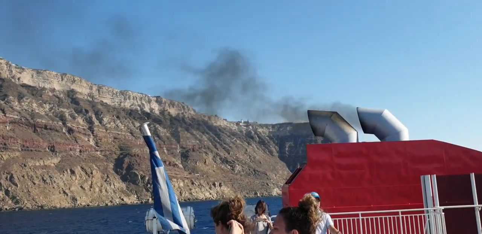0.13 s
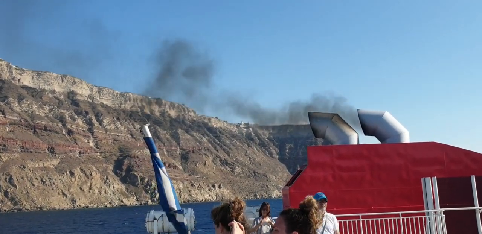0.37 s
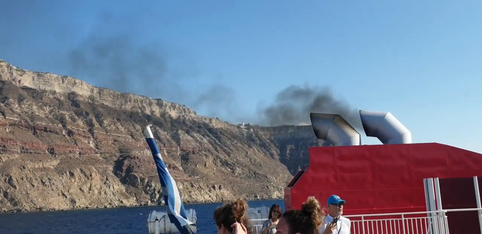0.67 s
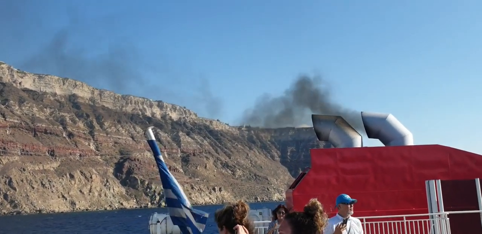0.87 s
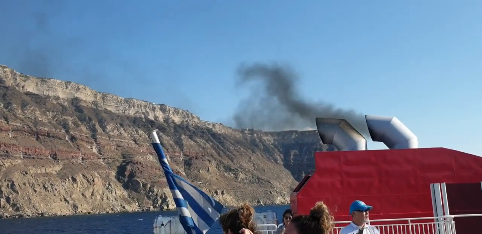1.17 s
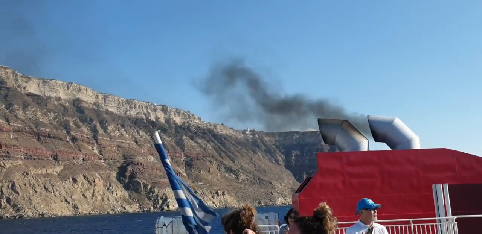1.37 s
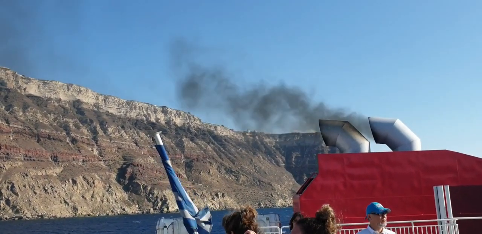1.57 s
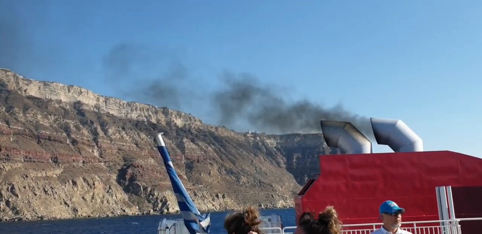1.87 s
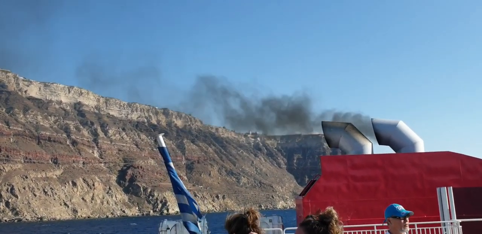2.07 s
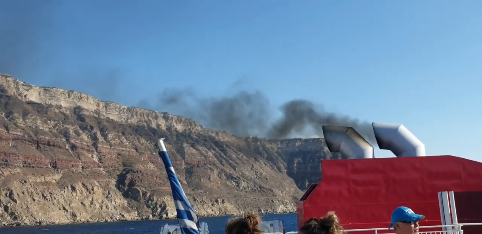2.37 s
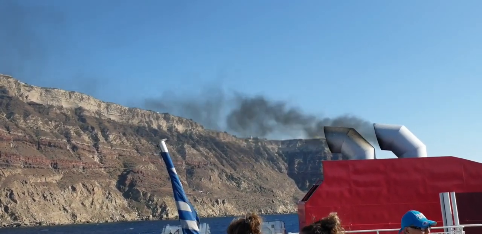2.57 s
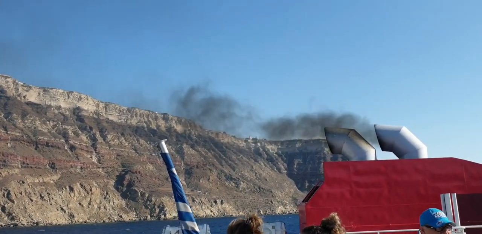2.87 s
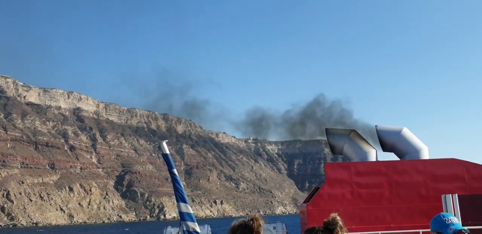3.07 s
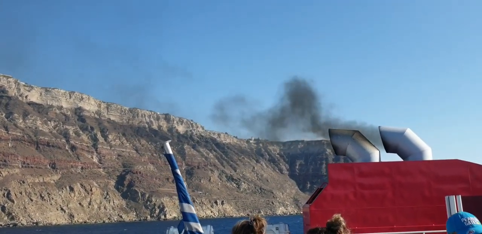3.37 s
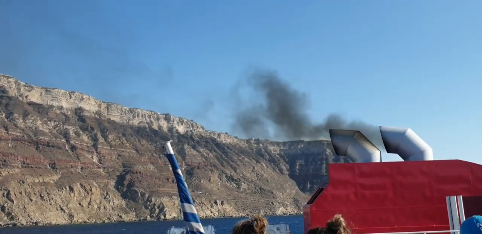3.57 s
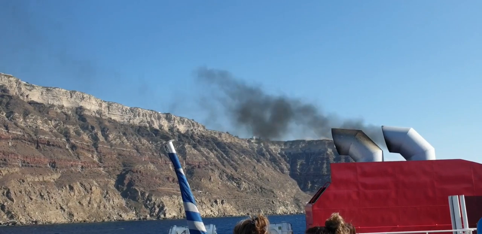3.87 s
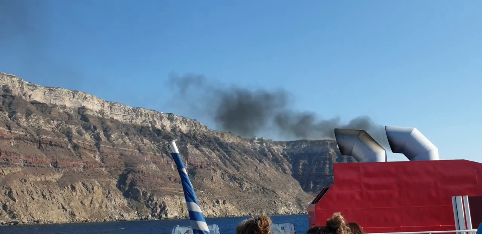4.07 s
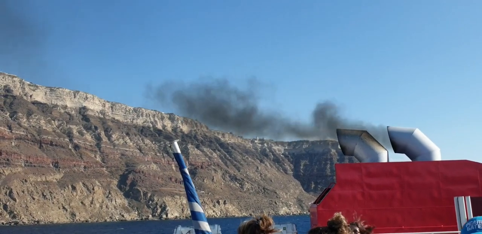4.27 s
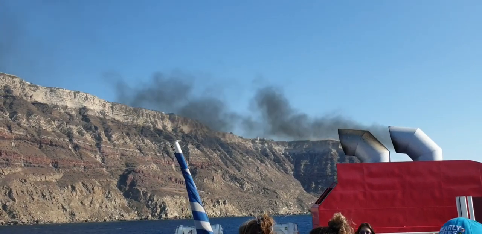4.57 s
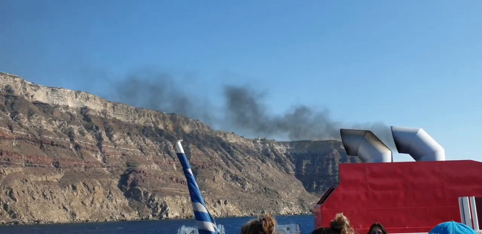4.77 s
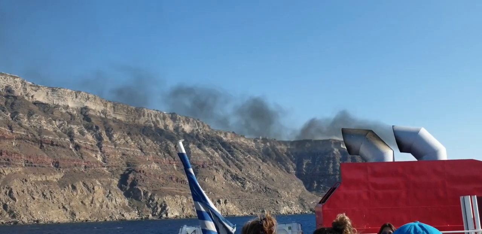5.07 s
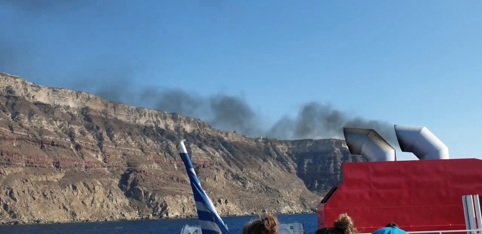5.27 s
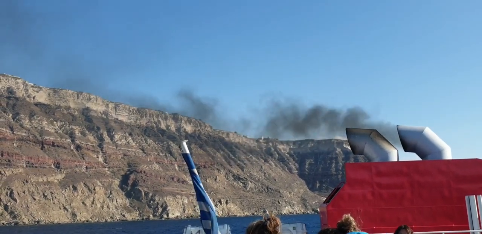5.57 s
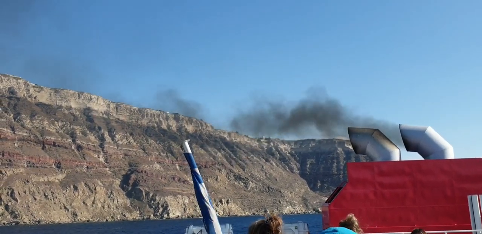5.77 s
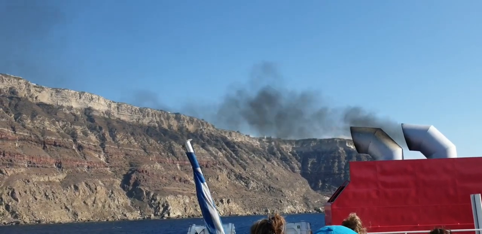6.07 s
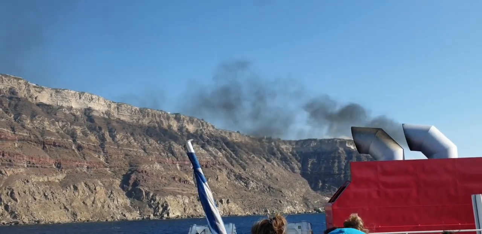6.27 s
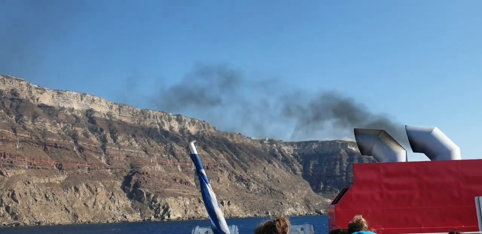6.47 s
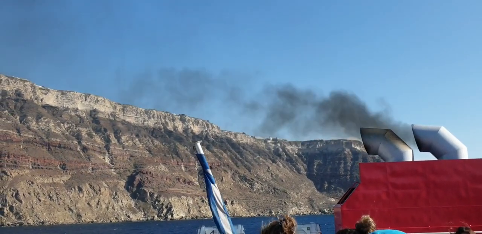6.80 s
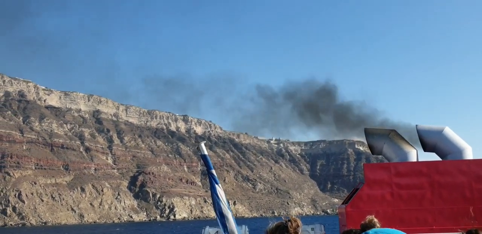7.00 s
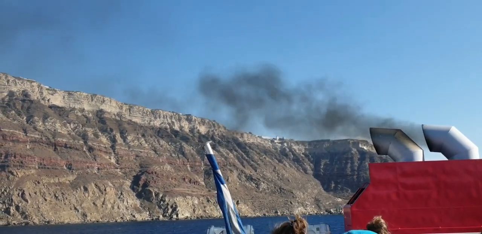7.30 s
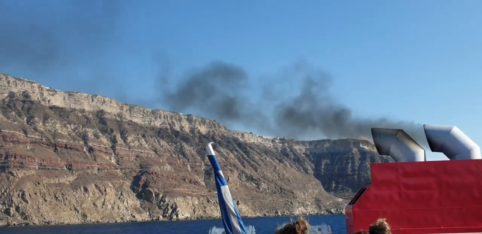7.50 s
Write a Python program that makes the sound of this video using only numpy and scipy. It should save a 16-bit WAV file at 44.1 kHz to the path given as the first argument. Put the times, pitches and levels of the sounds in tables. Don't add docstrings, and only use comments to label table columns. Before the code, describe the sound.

Deep uneven engine rumble and funnel roar, a steady fan hiss to the right, wind buffeting mostly on the left, faint splashes and tiny metal ticks.

```python
import sys
import numpy as np
from scipy import signal
from scipy.fft import rfft, irfft, next_fast_len
from scipy.io import wavfile
from scipy.ndimage import uniform_filter1d, map_coordinates

SR = 44100
rng = np.random.default_rng(int(sys.argv[2]) if len(sys.argv) > 2 else 0)


def attenuation_scalar(level_db):
    decades = np.asarray(level_db, float) / 20
    return 10 ** decades


def to_wav(s):
    ch = np.atleast_2d(s).T
    pcm = np.round(np.clip(ch, -1, 1) * 32767)
    wavfile.write(sys.argv[1], SR, pcm.astype(np.int16))


N = 336924


def unit(x):
    return x / np.sqrt(np.mean(x ** 2) + 1e-20)


def along(points, hz):
    f, v = np.transpose(points)
    return np.interp(np.log(hz + 1), np.log(f + 1), v)


def curves(rows):
    s, *columns = np.transpose(rows)
    return [np.interp(np.arange(N) / SR, s, column) for column in columns]


def wobble(rate):
    knots = rng.standard_normal(int(N * rate / SR) + 4)
    return map_coordinates(knots, [np.arange(N) * rate / SR])


def filtered(x, response):
    m = next_fast_len(x.shape[-1] + SR // 2)
    spectrum = rfft(x, m) * response(np.fft.rfftfreq(m, 1 / SR))
    return irfft(spectrum, m)[..., :x.shape[-1]]


def rush(spectrum, alike, patchy_db):
    z = signal.stft(rng.standard_normal((2, N)), nperseg=512)[2]
    patches = uniform_filter1d(rng.standard_normal(z.shape[1:]), size=6, axis=0)
    patches = unit(uniform_filter1d(patches, size=10, axis=1))
    pair = signal.istft(z * attenuation_scalar(patchy_db * patches), nperseg=512)[1][:, :N]

    def mid_side(hz):
        angle = np.arccos(np.clip(along(alike, hz), -1, 1)) / 2
        return attenuation_scalar(along(spectrum, hz)) * [np.cos(angle), np.sin(angle)]

    mid, side = filtered(pair, mid_side)
    return unit(np.array([mid + side, mid - side]))


def sides(pan_db):
    return attenuation_scalar(np.array([pan_db / 2, -pan_db / 2]))


def gusting():
    # peak t/s, half length/s, level over the calm/dB, left minus right/dB
    gust_rows = [(.08, .14, 7, -1.5), (0.301, .08, 4, 6), (0.549, .07, 6, -0.5), (0.678, .08, 7, 10.5),
                 (.91, .05, 6, 4), (1.037, .04, 4, -6.5), (1.303, .08, 5, 0.5), (1.75, .1, 4, -1.5),
                 (2.08, .05, 5, 2.5), (2.19, .07, 7, 13), (2.38, .08, 6, -5), (2.624, .05, 4, 7.5),
                 (2.9, .07, 5, 1), (3.27, .04, 7, 11), (3.462, .06, 9, 8.5), (3.801, .2, 3, -3.5),
                 (4.179, .05, 5, 11.5), (4.52, .05, 4.5, 10), (4.736, .04, 4, -0.5), (4.958, .07, 9, -2.5),
                 (5.151, .07, 6, 3.5), (5.36, .14, 11, 7.5), (5.598, .15, 11, -1.5), (5.9, .15, 5, 0),
                 (6.131, .06, 8, 1.5), (6.282, .11, 12, 4.5), (6.5, .1, 5, -4), (6.752, .12, 6.5, -1.5),
                 (7.102, .08, 4, 1.5), (7.379, .12, 5, -2)]
    calm_db = -50
    s, half, db, pan_db = np.transpose(gust_rows)[..., None]
    t = np.arange(0, N, 64) / SR
    bell = np.exp(-((t - s) / half) ** 2)
    level_db = calm_db + (db * bell).sum(axis=0)
    lean_db = (pan_db * bell).sum(axis=0)
    return [np.interp(np.arange(N) / SR, t, v) for v in (level_db, lean_db)]


def breeze():
    strength_db = uniform_filter1d(gusting()[0], size=SR // 3)
    return strength_db - strength_db.mean()


def firings(speed, carry_db, strength, late, scatter_db):
    speed = np.pad(speed, SR, mode="edge")
    cycle = np.cumsum(speed) / SR - speed[0]
    whole = np.arange(-5, 50)[:, None]
    firing = whole + (np.arange(len(late)) + late) / len(late)
    at = np.interp(firing, cycle, np.arange(len(cycle))).ravel()
    scatter = attenuation_scalar(scatter_db * rng.standard_normal((len(whole), len(late))))
    pulses = SR * np.bincount(np.round(at).astype(int), (strength * scatter).ravel(), len(cycle))
    return pulses * np.pad(attenuation_scalar(carry_db), SR, mode="edge")


def engines():
    # t/s, near engine f/Hz, far engine f/Hz
    speed_rows = [(0.0, 5.845, 5.886), (0.955, 5.874, 5.908), (1.91, 5.9, 5.938), (2.865, 5.924, 5.988),
                  (3.82, 5.981, 5.985), (4.775, 5.999, 6.049), (5.73, 6.033, 6.074), (6.685, 6.062, 6.146),
                  (7.64, 6.1, 6.058)]
    cylinders = [(0.53, -0.31, 0.76, -0.73), (0.91, -0.25, 0.86, -0.69), (0.3, -0.87, 0.6, -0.71),
                 (1.62, -0.24, 0.47, 0.18), (0.76, -0.09, 0.63, 0.16), (1.3, -0.02, 0.54, -0.57),
                 (0.22, -0.08, 0.85, 0.19), (2.0, -0.22, 1.0, -0.38), (1.04, -0.18, 0.64, -0.85),
                 (1.53, -0.1, 0.85, -0.63), (0.41, 0.1, 0.2, -0.04), (0.8, -0.12, 0.72, -0.71)]
    # t/s, near level/dB, far level/dB
    carry = [(0, 0.5, 1), (.6, 0, 2.5), (1.2, -2, 3), (1.8, 0, 1.5), (2.4, -0.5, 2), (3, -2, 0),
             (3.6, 1, -6.5), (4.2, 1, 2.5), (4.8, 1, -5), (5.4, -0.5, -4), (6, 2.5, 5), (6.6, 0.5, -.5),
             (7.1, -3.5, 4.5), (7.64, -3, 2)]
    # f/Hz, width/Hz, level/dB
    pipe_modes = [(32.8, 6.0, -64.5), (70.1, 15.6, -55.3), (125.3, 10.0, -71.3)]
    # multiple of the cycle, level/dB
    leak_tones = [(24, -49.5), (25, -44.5), (27, -64.5), (29, -52), (30, -43.5), (31, -51.5)]
    silencer_hz = 125
    near, near_late, far, far_late = np.transpose(cylinders)
    near_speed, far_speed = curves(speed_rows)
    near_db, far_db = curves(carry)
    pulses = firings(near_speed, near_db, near, near_late, scatter_db=0.27)
    pulses = pulses + firings(far_speed, far_db, far, far_late, scatter_db=2.15)

    def funnel(f):
        pipe = 0
        for k, (c, width, db) in enumerate(pipe_modes):
            pipe = pipe + (-1) ** k * attenuation_scalar(db) * 1j * f * width / (c * c - f * f + 1j * f * width)
        return pipe / np.sqrt(1 + (f / silencer_hz) ** 16)

    throb = filtered(pulses, funnel)[SR:SR + N]
    crank = 2 * np.pi * np.cumsum(near_speed) / SR
    leak = 0
    for k, db in leak_tones:
        leak = leak + attenuation_scalar(db + 1.0 * wobble(1.2)) * np.sin(np.round(k) * crank + wobble(0.93))
    return (throb + leak) * sides(-3.5)[:, None]


def roar():
    # f/Hz, level/dB per Hz
    gas = [(14, -38), (25, -25.5), (36, -13.5), (46, -3), (76, -4.5), (95, -14.5), (122, -2), (136, -16.5),
           (150, -11.5), (182, -15.5), (210, -19), (400, -31), (1100, -44.5), (2000, -70)]
    # f/Hz, left-right likeness
    gas_alike = [(60, .9), (120, .82), (200, 0.97), (400, 0.48), (1000, 0.15)]
    noise = attenuation_scalar(-28.0) * rush(gas, gas_alike, patchy_db=0.5) * sides(-3.8)[:, None]
    upper = filtered(noise, lambda f: np.clip((f - 100) / 40, 0, 1) * np.clip((400 - f) / 180, 0, 1))
    flow_db = 0.46 * breeze() + 1 * wobble(7)
    return noise + (attenuation_scalar(flow_db) - 1) * upper


def splashes():
    # crest t/s, rise/s, level over the wash/dB
    crests = [
        (2.15, .4, 0.5),
        (3.7, .2, 1.5),
        (4.2, 0.09, 3),
        (4.9, .06, 2),
        (5.24, .06, 2.5),
        (5.6, 0.056, 3.5),
        (5.75, .04, 2.5),
        (5.899, .1, 4),
        (6.4, .12, 4.5),
    ]
    fall_share = 0.91
    t = np.arange(N) / SR
    lift_db = 0
    for s, rise, db in crests:
        span = np.where(t < s, rise, fall_share * rise)
        lift_db = lift_db + db * np.exp(-((t - s) / span) ** 2)
    return lift_db


def vents(flutter):
    # f/Hz, level/dB per Hz
    fans = [(450, -24.5), (700, -9), (1000, -6), (1130, -8), (1230, -4), (1270, 1), (1330, 0), (1460, -2.5),
            (1810, -3), (2100, 0), (2440, -7), (3020, -5), (3250, -7.5), (4160, -42)]
    # f/Hz, left minus right/dB
    shadow = [(700, -6.5), (1200, -4.5), (1800, -8.5), (2750, -10.5), (3600, -14)]
    lag_s = .00045
    hiss = rush(fans, [(1000, 0.69), (3000, 0.52)], patchy_db=0.57)
    blade_hz = 1290 + 9 * wobble(18)
    blade = attenuation_scalar(-17.5 + 3 * wobble(5.7)) * np.sin(2 * np.pi * np.cumsum(blade_hz) / SR)
    left = filtered(hiss[0] + blade, lambda f: attenuation_scalar(along(shadow, f)) * np.exp(-2j * np.pi * f * lag_s))
    level_db = -44 + 0.24 * breeze() + .45 * splashes() + 0.2 * wobble(12) + 2.5 * flutter
    return attenuation_scalar(level_db) * np.array([left, hiss[1] + blade])


def spray(flutter):
    # f/Hz, level/dB per Hz
    ports = [
        [(2500, -27.5), (3300, 4), (4500, 1), (7300, -0.5), (8600, -8.5), (11000, -3.5), (14000, -5),
         (15700, -9)],
        [(2500, -31), (3500, 2), (4500, 4), (5800, -1.5), (8000, -8.5), (10000, -10), (11500, -4),
         (13000, -18.5), (15700, -20)],
    ]
    white = rush([(1000, 0)], [(4000, 0.1), (12000, 0.12)], patchy_db=0.3)
    wash = unit(filtered(white, lambda f: attenuation_scalar([along(port, f) for port in ports])))
    level_db = -61.5 + .12 * breeze() + splashes() + 0.51 * wobble(9) + 1.8 * flutter
    return attenuation_scalar(level_db) * wash


def swarm(count):
    crowd = np.cumsum(attenuation_scalar(1.8 * gusting()[0]))
    place, size, pitch, port = rng.random(count), *rng.standard_normal((count, 3)).T
    s = np.interp((np.arange(count) + place) / count, crowd / crowd[-1], np.arange(N) / SR)
    level_db, hz, pan_db = -31.5 + 2.5 * size, 313 * attenuation_scalar(1.8 * pitch), 9 + 11 * port
    return list(zip(np.clip(s, .05, 7.5), level_db, hz, pan_db))


def buffeting():
    # f/Hz, level/dB per Hz
    rumble = [(40, -6), (150, -0.5), (300, -7.5), (500, -12.5), (900, -28), (1600, -47.5), (4000, -69)]
    buffet_db, pan_db = gusting()
    lumps = attenuation_scalar(3.5 * np.array([wobble(70), wobble(70)]))
    white = unit(lumps * rng.standard_normal((2, N)))
    turbulence = unit(filtered(white, lambda f: attenuation_scalar(along(rumble, f))))
    veer_db = 5 * wobble(9)
    return turbulence * attenuation_scalar(buffet_db + 7.0 + 0.6 * wobble(8)) * sides(1.2 * pan_db + veer_db)


def wind():
    # t/s, level/dB, f/Hz, left minus right/dB
    strong = [(0.293, -23.5, 260, 10), (0.541, -23.5, 570, 15), (0.563, -25.5, 265, 1),
              (0.612, -20, 251, -2.5), (0.64, -19, 347, 24), (0.686, -13.5, 360, 24),
              (0.912, -14.5, 390, 10), (0.959, -20, 252, -20), (1.031, -22.5, 259, -16),
              (1.712, -31, 250, 12), (2.069, -21, 312, 9), (2.172, -16, 327, 12), (2.268, -19.5, 340, 14),
              (2.41, -19, 283, -17), (2.62, -25, 370, 18), (3.252, -17, 240, 5.5), (3.29, -21.5, 450, 17),
              (3.467, -23, 336, 15), (4.188, -23, 250, 15), (5.002, -19, 250, -26.5), (5.363, -24, 293, 19),
              (5.525, -25, 480, 3.5), (5.637, -24, 700, -6), (5.727, -21.5, 250, 13),
              (6.124, -15.5, 287, 13), (6.205, -17.5, 385, 21), (6.253, -15, 380, -18),
              (6.283, -30, 640, 7), (6.356, -25, 730, 17), (7.353, -24, 248, 14)]
    eddy_cycles = 1.82
    gusts = buffeting()
    half = SR // 40
    t = np.arange(-half, half) / SR
    eddies = [*strong, *swarm(count=50)]
    for (s, db, hz, pan_db), turn in zip(eddies, rng.random(len(eddies))):
        swell = np.exp(-(t / (0.34 * eddy_cycles / hz)) ** 2)
        puff = swell * np.sin(2 * np.pi * (0.94 * hz * t + turn))
        rag = signal.lfilter(*signal.butter(3, 700, fs=SR), rng.standard_normal((2, len(t))))
        puff = puff + 1.3 * np.sqrt(swell) * rag
        far_port = attenuation_scalar(np.minimum(0, [4.3 * pan_db, -1.3 * pan_db]))
        gusts[:, round(s * SR) - half:][:, :len(t)] += attenuation_scalar(db + 0.1) * far_port[:, None] * puff
    return gusts


def flag_clip():
    # t/s, peak level/dB, left minus right/dB
    knocks = [
        (0.6476, -46, -3),
        (1.6591, -55.5, -1.5),
        (1.8295, -48, -2.5),
        (2.2719, -47, 1.5),
        (5.248, -51, -1.5),
        (6.536, -45, 0),
        (6.8492, -59.5, 3),
    ]
    ticks, t = np.zeros((2, N)), np.arange(SR // 100) / SR
    for s, db, pan_db in knocks:
        crack = attenuation_scalar(db + 0.5 - 60 * t / .004) * rng.standard_normal(len(t))
        ticks[:, round(s * SR):][:, :len(t)] += sides(pan_db)[:, None] * crack
    return filtered(ticks, lambda f: (f > 6500) * (f < 15500))


def scene():
    flutter = np.tanh(0.54 * wobble(30))
    return engines() + roar() + vents(flutter) + spray(flutter) + wind() + flag_clip()


def top_cut(x):
    return signal.sosfilt(signal.butter(12, 15762, fs=SR, output="sos"), x)


def record(dry):
    block, start = 1024, 486
    count = N // block + 3
    place = (np.arange(N) - start) / block + 1
    near_join = np.cos(np.pi * place) ** 6
    out = dry
    for low_hz, high_hz in [(3200, 7000), (7000, 20000)]:
        miss_db = 3.2 * (rng.random((2, count)) - .5) + 2.8 * (rng.random(count) - .5)
        gain = uniform_filter1d(attenuation_scalar(miss_db)[:, place.astype(int)], size=300, axis=1)
        dip_db = 3.8 * rng.exponential(size=count)[np.round(place).astype(int)] * near_join
        band = filtered(dry, lambda f: np.clip((f - low_hz) / 600, 0, 1) - np.clip((f - high_hz) / 600, 0, 1))
        out = out + (gain * attenuation_scalar(1.2 - dip_db) - 1) * band
    return top_cut(out)


dry = scene()
out = record(dry)
to_wav(out)
```